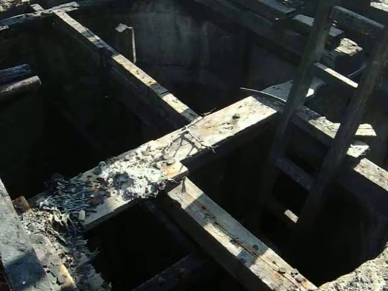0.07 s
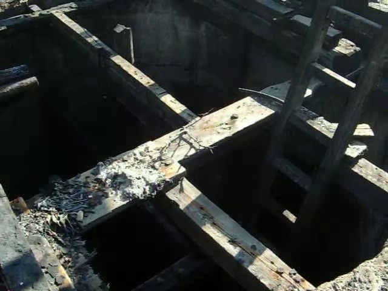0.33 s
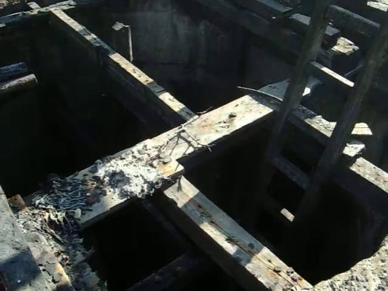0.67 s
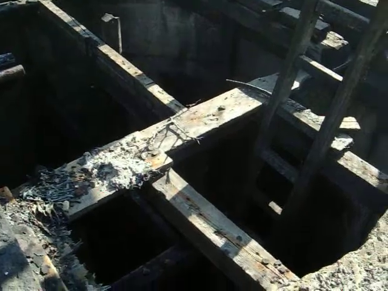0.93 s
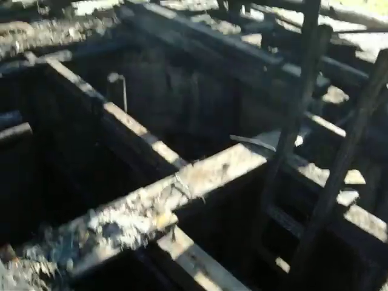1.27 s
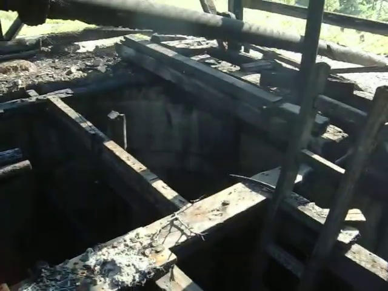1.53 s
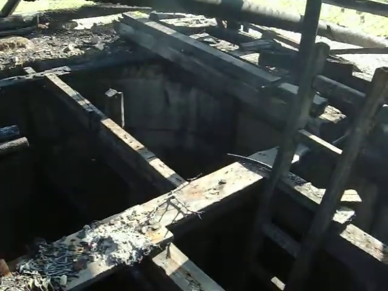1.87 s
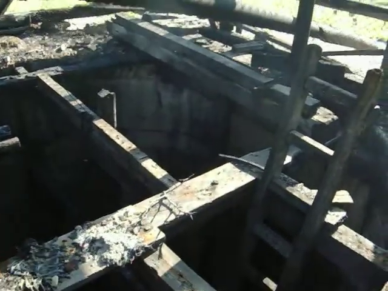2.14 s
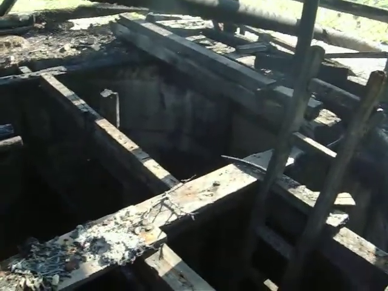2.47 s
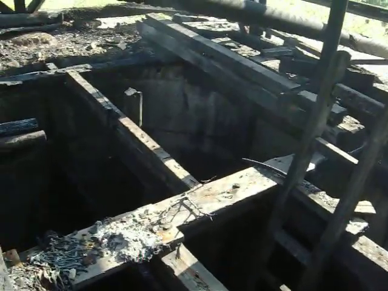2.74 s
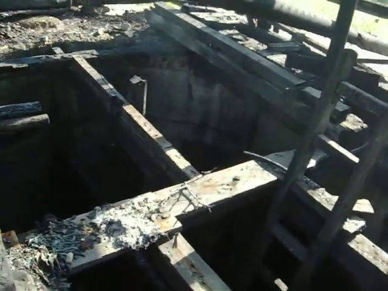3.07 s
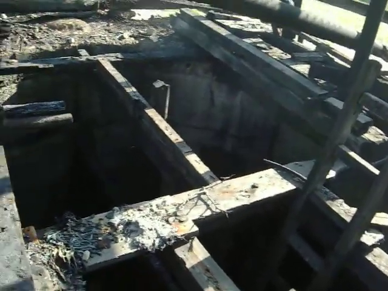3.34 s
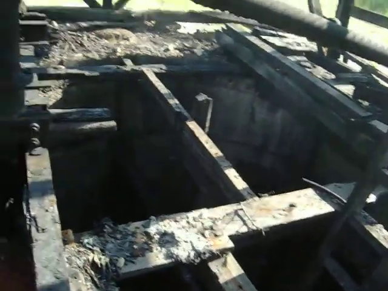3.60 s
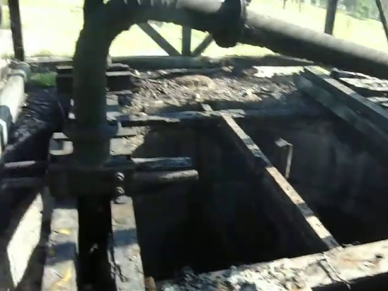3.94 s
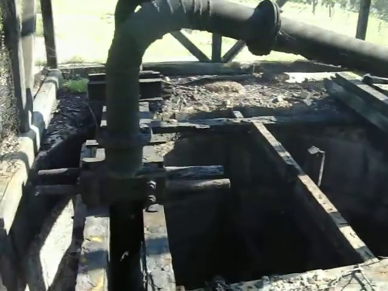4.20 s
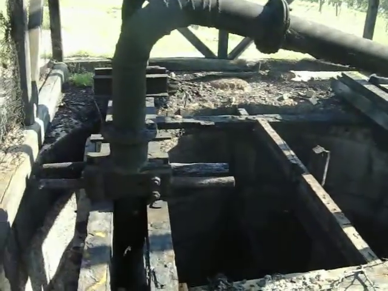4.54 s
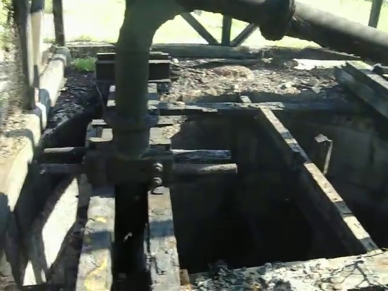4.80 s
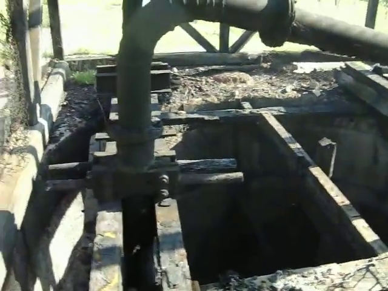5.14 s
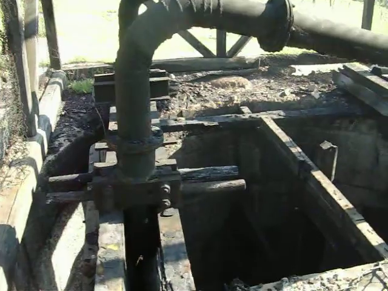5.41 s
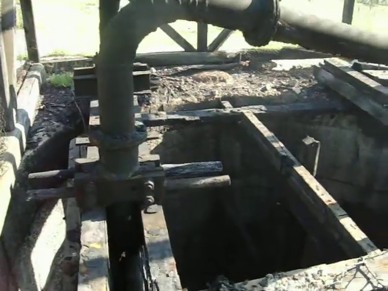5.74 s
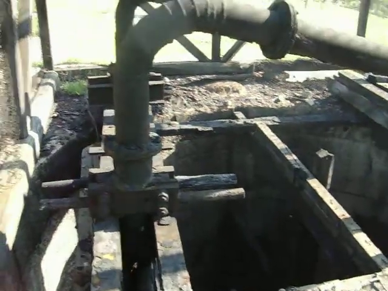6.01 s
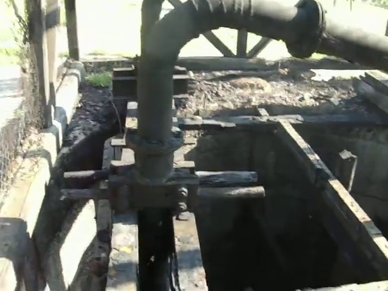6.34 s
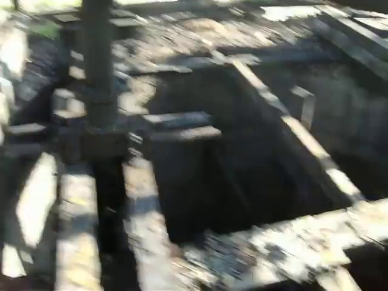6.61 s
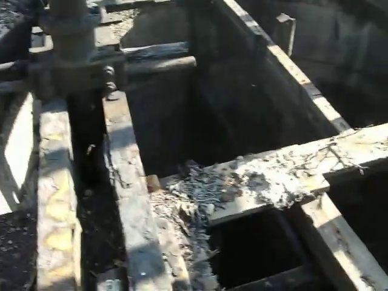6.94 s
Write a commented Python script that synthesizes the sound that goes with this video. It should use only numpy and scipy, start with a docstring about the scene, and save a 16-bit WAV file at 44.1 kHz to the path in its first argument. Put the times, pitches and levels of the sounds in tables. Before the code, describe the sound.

A broad rush of air with a hollow note pours out of a deep open shaft. The draught rumbles on a hand-held microphone and lands in uneven thumps; after the hard ones the rush dips and swells back. A few tiny ticks sound close up in the first half. Toward the end the wind picks up, hitting harder and brighter and overloading the microphone as the rush recedes.

```python
"""A broad rush of air with a hollow note in it pours out of a deep, open ventilation shaft.
The draught rumbles on a hand-held camera's microphone, and its eddies land as thumps. The hard hits
overload it; the gain control ducks the rush, which then swells back. Three small ticks sound right at
the microphone. Towards the end the wind freshens: the eddies hit harder and brighter as the rush recedes."""
import sys
import numpy as np
from scipy import signal
from scipy.fft import rfft, irfft, next_fast_len
from scipy.io import wavfile
from scipy.ndimage import uniform_filter1d

SR = 44100
rng = np.random.default_rng(int(sys.argv[2]) if len(sys.argv) > 2 else 0)


def output_pcm(signal):
    """Save a mono or channel-first signal as 16-bit PCM at the path in sys.argv[1].

    Samples are clipped to [-1, 1] before scaling.
    """
    pcm = np.clip(np.atleast_2d(signal).T, -1, 1) * 32767
    wavfile.write(sys.argv[1], SR, np.round(pcm).astype(np.int16))


N = 307377

# tone of the rush: (frequency [Hz], relative level [dB])
RUSH_EQ = [(20, -25.5), (55, -2.5), (130, -7), (230, -1.5), (450, -4), (780, -2.5), (1200, -7.5),
           (2000, -11.5), (2900, -10.5), (3900, -8.5), (4600, -14), (6000, -16.5)]
# the shaft's hollow note: (centre [Hz], width [Hz], lift [dB])
SHAFT_RESONANCE = (332, 44, 7.5)
# fader rides as the camera moves: (time [s], rush level [dB], draught level [dB])
AIR_FADERS = [(0, -12.5, -23.5), (1, -8.5, -12), (2, -8.5, -12.5), (2.999, -12.5, -27),
              (3.601, -7.5, -18.5), (4.202, -9.5, -18), (4.999, -10, -22.5), (5.5, -10.5, -22),
              (6.2, -15, -2), (7, -21, -5)]
# the microphone thins the wind's deep bass: (frequency [Hz], gain [dB])
MIC_BASS_EQ = [(20, -21.5), (55, -10), (100, -5.5), (160, -1), (250, 1.5)]
# an eddy's favoured swing: (centre [x corner frequency], width [x corner frequency], lift [dB])
EDDY_RESONANCE = (1, 0.99, 2.04)
# large eddies striking the microphone: (mid time [s], length [s], level before ducking [dB])
EDDY_HITS = [(0.465, 0.014, -1), (0.741, 0.078, 3.5), (0.79, 0.058, 3), (0.883, 0.15, -3),
             (1.207, 0.061, -2.5), (1.377, .03, -4.5), (1.5, .07, -5.5), (1.54, .05, 5),
             (1.586, 0.048, 2.5), (1.75, 0.047, 18), (1.858, 0.049, 0.5), (1.999, 0.053, -0.5),
             (2.035, 0.022, 4.5), (2.076, 0.052, 9), (2.125, 0.056, 1.5), (2.2, .042, 14), (2.327, 0.12, 6),
             (2.399, 0.031, 17.5), (2.646, 0.067, -3), (2.815, .016, 0), (2.854, 0.023, 14),
             (2.89, 0.011, 6.5), (2.96, .028, 5.5), (3.144, 0.04, 6.5), (3.334, 0.014, 12.5),
             (3.365, 0.037, 2.5), (3.401, 0.021, 7.5), (3.634, 0.0064, 12), (3.69, 0.025, 9.5),
             (3.73, 0.071, 8.5), (3.874, .034, -1.5), (4.001, 0.029, 0), (4.034, 0.025, 6.5),
             (4.161, 0.074, 12), (4.233, .04, 6.5), (4.305, 0.023, 4), (4.423, 0.058, -2),
             (4.489, .045, 8.5), (4.713, .12, 4), (4.82, 0.063, 8.5), (5.031, 0.028, 12.5),
             (5.068, 0.046, 10.5), (5.178, 0.023, 3), (5.226, .041, 4), (5.33, 0.086, 2.5),
             (5.473, 0.048, 8), (5.501, 0.024, 7.5), (5.595, 0.034, 9), (5.631, 0.078, 5.5),
             (5.77, 0.15, 12), (5.835, 0.03, 8.5), (5.875, 0.045, 3.5), (5.935, 0.052, -2),
             (5.991, 0.077, 14.5), (6.166, 0.0774, 17.5), (6.269, 0.024, 11), (6.308, .1, 11.5),
             (6.377, 0.06, 11.5), (6.437, 0.037, 11.5), (6.474, 0.049, 13), (6.521, 0.015, 10.5),
             (6.546, 0.024, 19), (6.574, 0.12, 10), (6.661, 0.077, 11.5), (6.71, 0.018, 12),
             (6.803, .11, 9), (6.862, 0.028, 10), (6.931, 0.15, 19)]
# ticks, before ducking and EQ: (time [s], snap level [dB], chirp level [dB], from [Hz], to [Hz])
TICK_CUES = [(1.087, 33, -7, 5420, 2600), (2.6656, 32, 7, 5930, 1680), (2.698, 16, 15.5, 5000, 1140)]
# the camera's steep treble roll-off: (frequency [Hz], gain [dB])
CAMERA_TREBLE_EQ = [(4200, 0.5), (5000, -6.5), (5500, -13), (5900, -25.5), (6300, -40.5), (7000, -82.5)]

FRESHEN_FROM_S = 5.52


def gain_of(db):
    """Decibels to amplitude."""
    return 10 ** (np.asarray(db) / 20)


def unit_rms(x):
    """Scales to an rms of one."""
    return x / np.sqrt(np.mean(abs(x) ** 2) + 1e-20)


def eq_curve(points, hz):
    """Gain of an EQ table, on a log-frequency axis."""
    point_hz, db = np.transpose(points)
    return gain_of(np.interp(np.log(hz + 1), np.log(point_hz), db))


def resonance(hz, centre_hz, width_hz, lift_db):
    """Gain of one bell above a flat response."""
    return 1 + (gain_of(lift_db) - 1) / (1 + (2 * (hz - centre_hz) / width_hz) ** 2)


def filtered(x, gain):
    """Filters x by a gain given as a function of Hz."""
    size = next_fast_len(len(x))
    return irfft(rfft(x, size) * gain(np.fft.rfftfreq(size, 1 / SR)), size)[:len(x)]


def wander(rate_hz):
    """Smooth random modulation with an rms of one."""
    return unit_rms(filtered(rng.standard_normal(N), lambda hz: 1 / (1 + (hz / rate_hz) ** 4)))


def air_fader(column):
    """One fader ride, as a gain per sample."""
    rows = np.array(AIR_FADERS)
    return gain_of(np.interp(np.arange(N) / SR, rows[:, 0], rows[:, column]))


def add_centred(mix, time_s, sound):
    """Mixes a sound in, centred on its cue."""
    part = mix[max(round(time_s * SR) - len(sound) // 2, 0):][:len(sound)]
    part += sound[:len(part)]


def freshened_s(time_s):
    """Seconds for which the wind has been picking up."""
    return max(time_s - FRESHEN_FROM_S, 0)


def shaft_rush(flutter_db=1.52):
    """The bed: broad flow noise rings the shaft's hollow note and flutters a little."""
    noise = rng.standard_normal(N)
    flow = filtered(noise, lambda hz: eq_curve(RUSH_EQ, hz) * resonance(hz, *SHAFT_RESONANCE))
    flutter = gain_of(flutter_db * wander(rate_hz=12.8))
    return unit_rms(flow) * air_fader(column=1) * flutter


def turbulence(pushes, corner_hz, slope=2.77):
    """Wind pressure on the microphone: each push starts sharply and swings out as a dull thud."""
    size = next_fast_len(len(pushes))
    hz = abs(np.fft.fftfreq(size, 1 / SR))
    centre, width, lift_db = EDDY_RESONANCE
    swing = resonance(hz, centre * corner_hz, width * corner_hz, lift_db)
    tone = eq_curve(MIC_BASS_EQ, hz) * swing / (1 + (hz / corner_hz) ** slope)
    minimum_phase = np.exp(np.conj(signal.hilbert(np.log(tone))))[:size // 2 + 1]  # keeps attacks sharp
    return unit_rms(irfft(rfft(pushes, size) * minimum_phase, size)[:len(pushes)])


def draught(lumpy_db=4.0):
    """The draught lays a lumpy rumble on the microphone under the eddies."""
    lumps = unit_rms(gain_of(lumpy_db * wander(rate_hz=67)))
    return turbulence(rng.standard_normal(N), corner_hz=402) * lumps * air_fader(column=2)


def slaps(size, per_s=150, spread_db=4.0, fine_gain=0.76):
    """Sudden pushes of air, of either sign and unevenly spaced, over finer turbulence."""
    sign, strength, fine = rng.standard_normal((3, size))
    times = np.cumsum(.5 + rng.random(size)) / per_s - rng.random()
    onsets = (times[times > 0] * SR).astype(int)
    pushes = np.isin(np.arange(size), onsets) * np.sign(sign) * gain_of(spread_db * strength)
    return unit_rms(pushes) + fine_gain * fine


def eddy(time_s, length_s, db, base_hz=442.6, db_per_octave=32.5, octaves_per_s=0.65, rise_s=0.0035):
    """One thump: a volley of slaps with a steep front, brighter when it hits harder or the wind freshens."""
    octaves = db / db_per_octave + octaves_per_s * freshened_s(time_s)
    swirl = signal.hilbert(turbulence(slaps(size=8192), corner_hz=base_hz * 2 ** octaves))
    swirl /= (abs(swirl) ** 2 + 0.056) ** 0.135  # gentle compression evens out the swings
    t = (np.arange(len(swirl)) - len(swirl) / 2) / SR
    swell = np.cos(np.pi * np.clip(t / length_s, -.5, .5)) ** 2
    swell *= np.clip((t + .27 * length_s) / rise_s + 1, 0, 1)  # the steep front
    mid_rms = np.sqrt(np.average(swirl.real ** 2, weights=swell ** 4))
    return gain_of(db) * swell * swirl.real / mid_rms


def large_eddies():
    """The big hits: each eddy thumps the microphone on its cue."""
    out = np.zeros(N)
    for time_s, length_s, db in EDDY_HITS:
        add_centred(out, time_s, eddy(time_s, length_s, db))
    return out


def ticks(length_s=0.004, snap_hz=11000):
    """Tiny falling chirps; a snap above the camera's treble range goes unheard but trips the ducking."""
    out = np.zeros(N)
    t = np.arange(round(length_s * SR)) / SR
    window = np.hanning(len(t))
    for time_s, snap_db, chirp_db, from_hz, to_hz in TICK_CUES:
        glide_hz = np.geomspace(from_hz, to_hz, len(t))
        chirp = np.sin(2 * np.pi * np.cumsum(glide_hz) / SR)
        snap = np.sin(2 * np.pi * snap_hz * t)
        add_centred(out, time_s, window * gain_of(chirp_db) * chirp)
        add_centred(out, time_s + length_s / 2, window * gain_of(snap_db) * snap)
    return out


def small_eddies(from_s=1.2, per_s=14, length_s=0.031, base_db=-6, spread_db=1.5, build_db_per_s=13):
    """Short, uneven thumps fill in once the camera is in the wind, and build as it freshens."""
    out = np.zeros(N)
    gaps, scatter = rng.random((128, 2)).T
    times = from_s + np.cumsum(.5 + gaps) / per_s
    for time_s, chance in zip(times[times < N / SR], scatter):
        db = base_db + spread_db * (2 * chance - 1) + build_db_per_s * freshened_s(time_s)
        add_centred(out, time_s, eddy(time_s, length_s, db))
    return out


def scene():
    """The shaft, the wind and the ticks in mono at one microphone."""
    return (shaft_rush() + draught() + large_eddies() + ticks() + small_eddies())[None]


def gain_control(x, threshold_db=-6., sense_s=0.0048, attack_s=0.0017, release_db_per_s=65, range_db=23):
    """Ducks within milliseconds of a hit, then lets the sound swell back over tenths of a second."""
    level = np.sqrt(abs(uniform_filter1d(x ** 2, round(sense_s * SR))))
    log_excess = np.log(np.clip(level / gain_of(threshold_db) - 1, 1e-6, gain_of(range_db)))
    release = np.arange(N) / SR * release_db_per_s * np.log(10) / 20
    held_excess = np.exp(np.maximum.accumulate(log_excess + release) - release)  # decaying peak hold
    pole = np.exp(-1 / (attack_s * SR))
    duck = signal.lfilter([1 - pole], [1, -pole], held_excess / (1 + held_excess))
    return x * (1 - duck)


def record(dry, silent_s=.072, ceiling=.715, headroom=1.166, knee=4.8, top_hz=6100, band_hz=15800):
    """The camera's chain opens after a moment of silence: ducking, dulled treble, overload, band limit."""
    x = gain_control(dry[0]) * (np.arange(N) / SR > silent_s)
    x = filtered(x, lambda hz: eq_curve(CAMERA_TREBLE_EQ, hz))
    x = x / (1 + abs(x / (ceiling * headroom)) ** knee) ** (1 / knee)  # the amplifier rounds off peaks
    x = filtered(x, lambda hz: 1 / (1 + (hz / top_hz) ** 36))
    x = np.clip(x, -ceiling, ceiling)
    band_limit = signal.firwin(511, band_hz, window=("kaiser", 9), fs=SR)
    return signal.oaconvolve(x, band_limit, "same")[None]


dry = scene()
out = record(dry)
output_pcm(out)
```